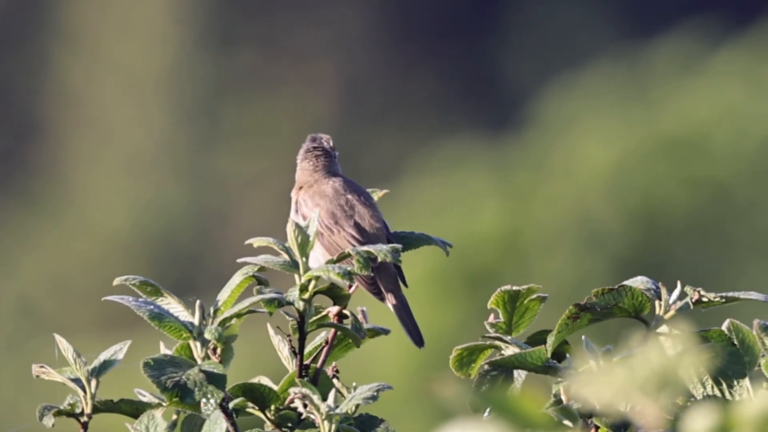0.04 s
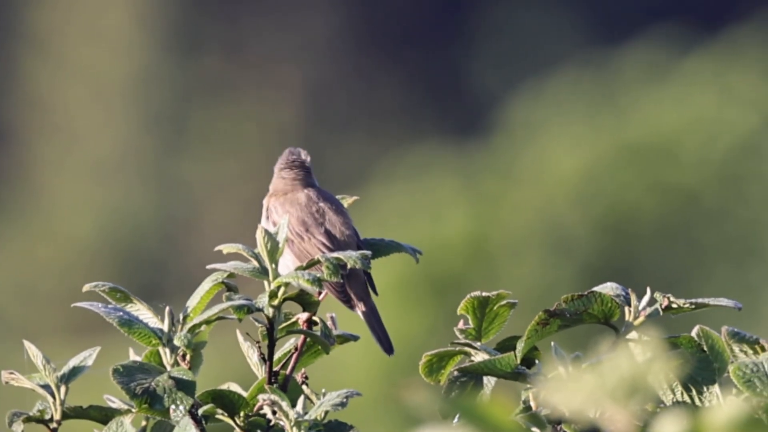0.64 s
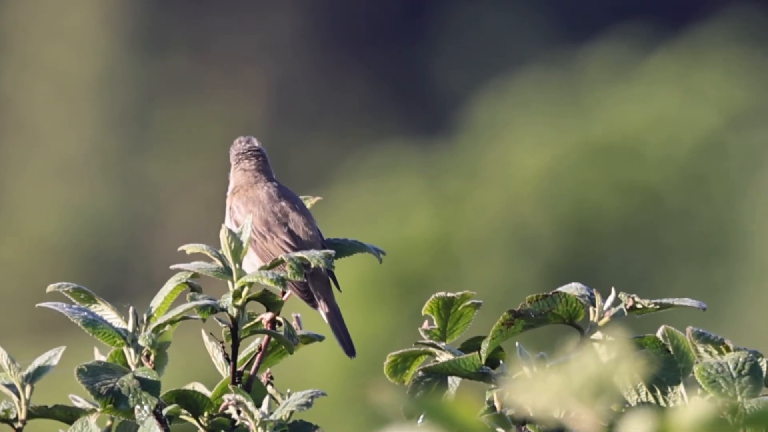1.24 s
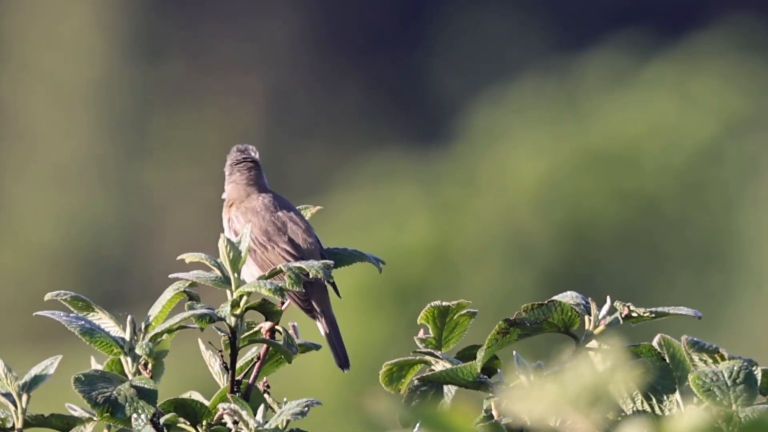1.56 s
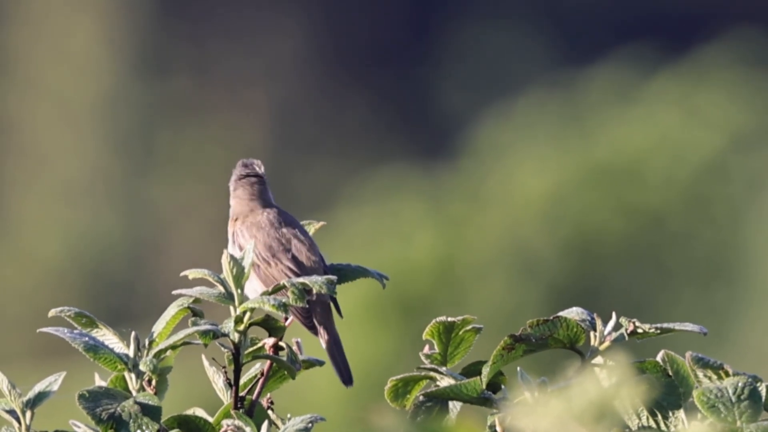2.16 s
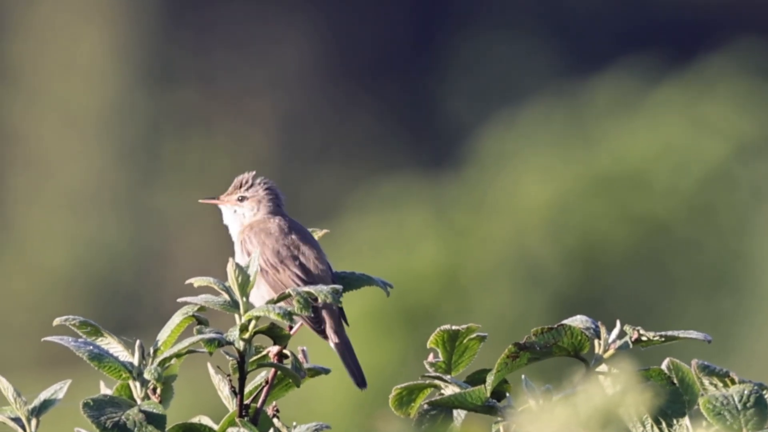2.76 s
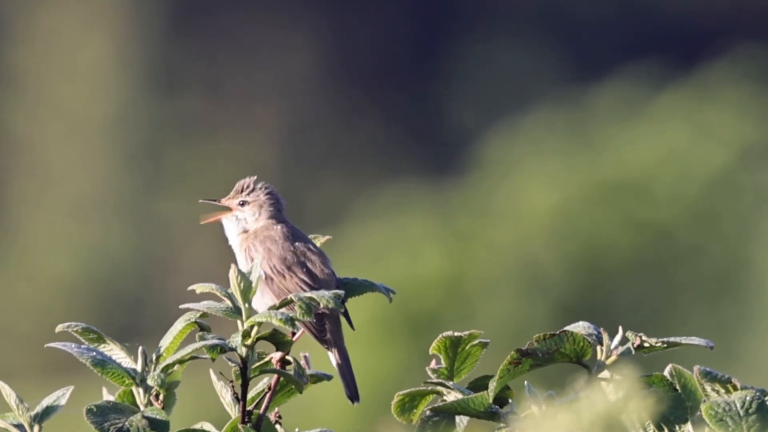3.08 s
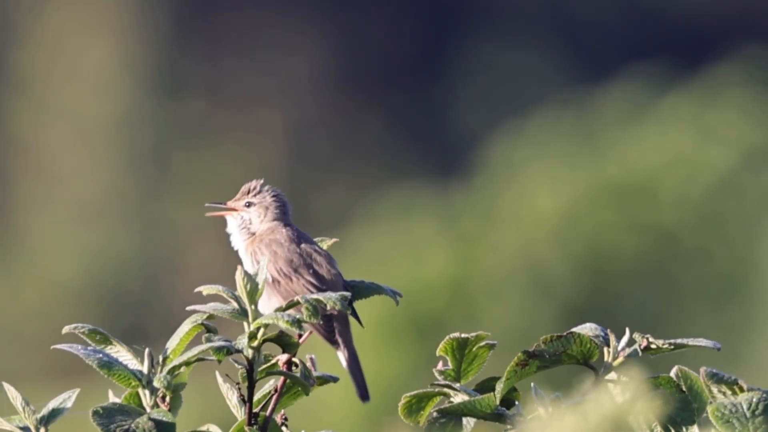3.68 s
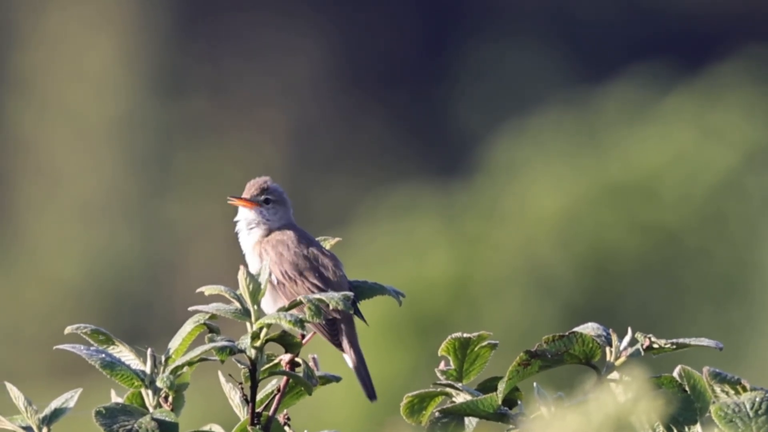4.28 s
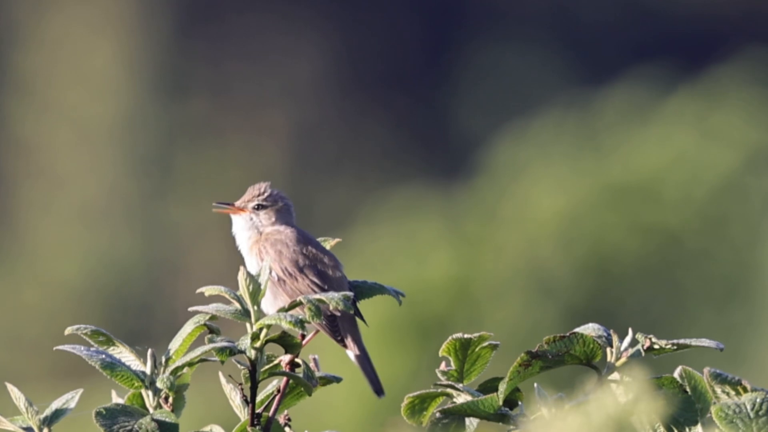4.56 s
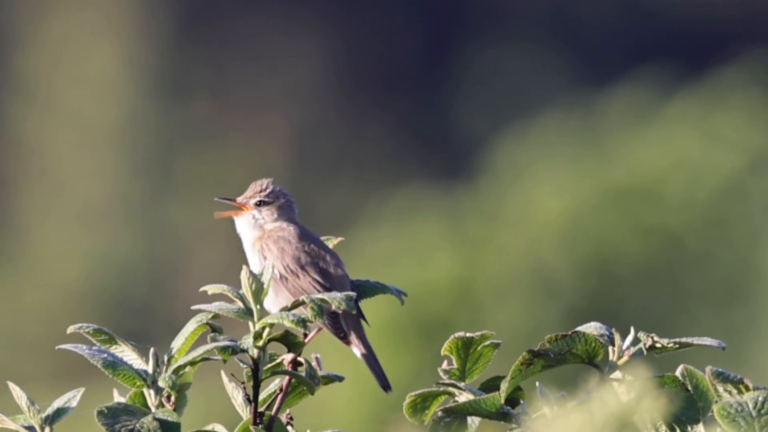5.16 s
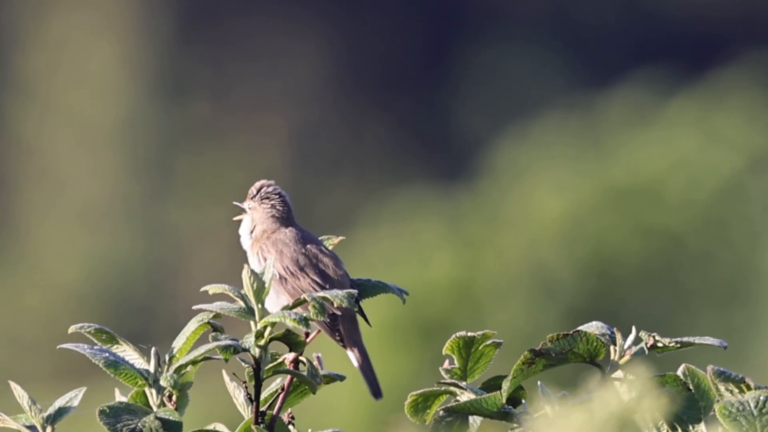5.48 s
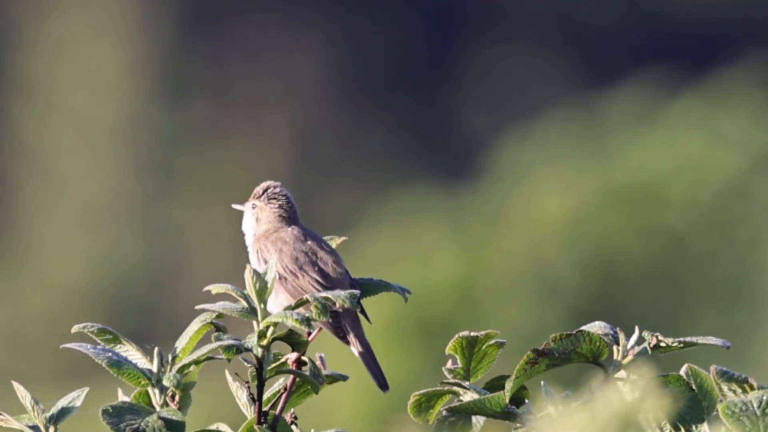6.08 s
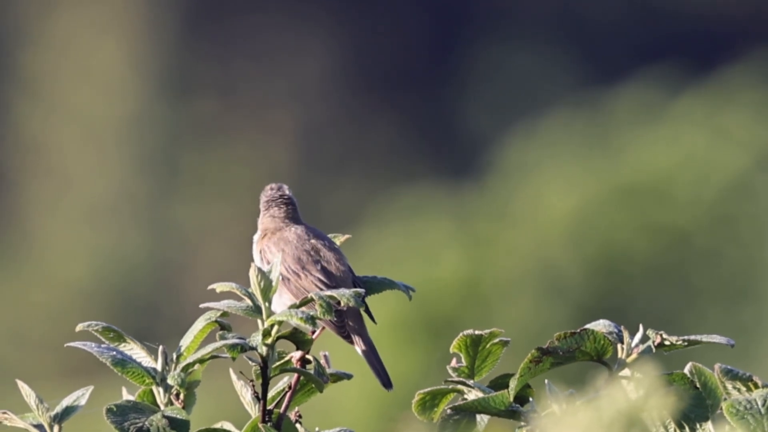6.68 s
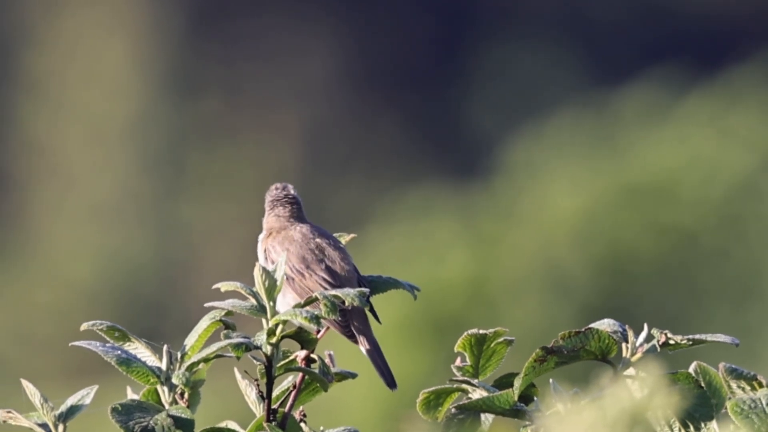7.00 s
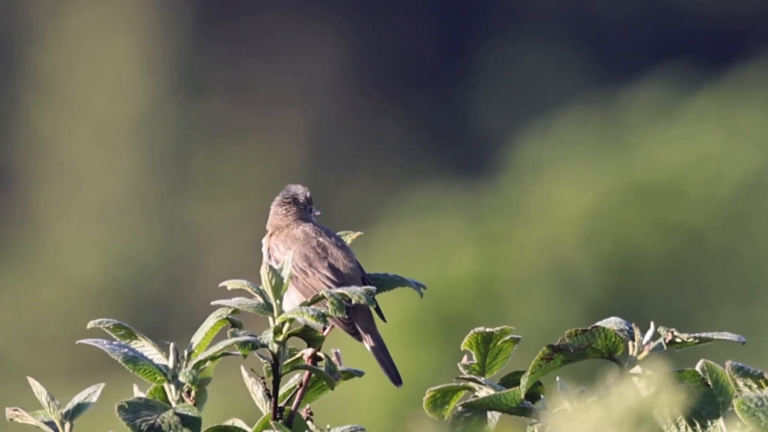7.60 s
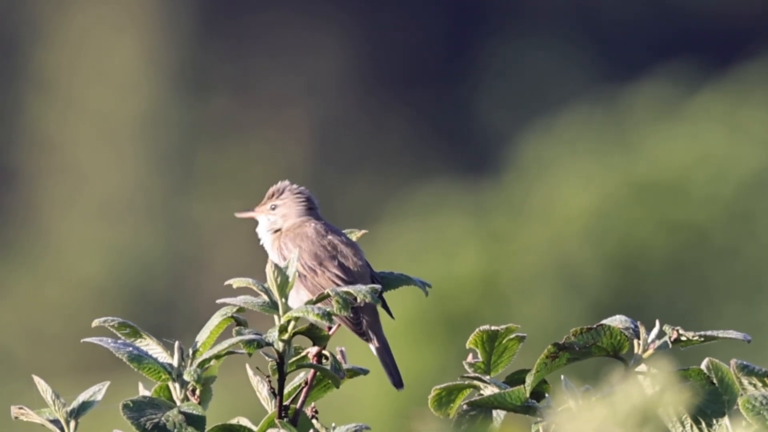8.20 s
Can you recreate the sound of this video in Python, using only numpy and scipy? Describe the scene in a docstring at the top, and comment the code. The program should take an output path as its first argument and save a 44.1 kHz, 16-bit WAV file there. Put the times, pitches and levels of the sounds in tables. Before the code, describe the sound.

A soft, steady wash of distant wind fills open shrubland, and small birds give thin whistles and two-note calls farther off. Leaves rustle faintly around 0.2 to 0.6 seconds. A faint dry tick comes at 0.5 seconds and a sharp one at 0.9, near the microphone. From about 1.3 seconds a warbler sings close by, opening with a soft rasp and four rising whistles. Nasal calls, hoarse rasps and sharp falling chirps follow from 2 to 3.4 seconds, then a fast run of rippling chips until 4.5. Loud squeaks mix with harsh low notes until 5.3, leading into a rapid two-toned trill that ends at 6, with two short notes after it. The foliage adds a light, short echo. From 6.3 seconds to the end, a little after 8, only quieter birds remain, with whistles, short falling notes and purring calls over the hush.

```python
"""Open shrubland. A warbler sings from the top of a bush: rising whistles, rippling chips, rasps, nasal
calls and a two-voiced trill. One side of its syrinx whistles; both sides together squeak and trill.
Other small birds sing farther off, the foliage scatters every note back, and the open air murmurs
underneath. Early on, leaves rustle and two ticks, one faint and one sharp, sound near the microphone."""
import sys
import numpy as np
from scipy import signal
from scipy.fft import rfft, irfft, next_fast_len
from scipy.io import wavfile
from scipy.ndimage import uniform_filter1d

SR = 44100
rng = np.random.default_rng(int(sys.argv[2]) if len(sys.argv) > 2 else 0)


def dump_mix(stems):
    """Bounce the given channels to the path in sys.argv[1] as a 16-bit WAV at rate SR."""
    frames = np.atleast_2d(stems).T  # one column per channel
    limited = np.clip(frames, -1, 1)  # hard clip at full scale
    pcm = np.round(limited * 32767).astype(np.int16)
    wavfile.write(sys.argv[1], SR, pcm)


N = 367794
TIME = np.arange(N) / SR
UPPER_HZ, UPPER_WIDTH_HZ = 12230, 1260  # the windpipe's upper resonance
BAND_LIMIT_HZ = 15720


def warbler():
    """The near bird's whole phrase, from pure whistles to hoarse noise."""
    return gather(slurs() + stutters() + fast_run() + chucks() + squeaks() + trill() + nasals() + rasps())


def slurs():
    """The warbler's fluttering whistles: rising arches, quick flicks and one long swoop."""
    # Note shapes. Each row: share of the note, pitch in Hz, level in dB, ripple depth in Hz.
    arch = [(0, 2940, -14, 197), (.15, 3680, 0.5, 323), (.3, 4190, -2.5, 43), (.63, 4325, -0.5, 3),
            (.84, 4320, -2, 0), (1, 3954, -6.5, 0)]
    flick = [(0, 3110, -10, 400), (.28, 4450, 3, 400), (.53, 5690, -9.5, 350), (.62, 4900, -7.5, 300),
             (.8, 3400, -1.5, 350), (1, 2330, -10, 297)]
    # Each row: start in seconds, length in seconds, level in dB and, for arches, a pitch factor.
    arches = [(1.487, 0.079, -43, 1.005), (1.624, 0.083, -40, 1.012), (1.787, 0.079, -39, 0.9812),
              (1.935, 0.081, -37, 1.01)]
    flicks = [(2.399, .03, -41.5), (3.199, .028, -39.5)]
    # Up and down again. Each row: time in seconds, pitch in Hz, level in dB, ripple depth in Hz.
    swoop = [(3.467, 2050, -51.5, 200), (3.475, 2836, -44, 400), (3.487, 4250, -54.5, 705),
             (3.494, 5470, -54, 500), (3.503, 5750, -41.5, 500), (3.516, 4500, -41.5, 645),
             (3.531, 2960, -36.5, 540), (3.54, 2500, -49, 302)]
    notes = [sing(arch, *row, overtone_db=-38, upper_db=-28) for row in arches]
    notes += [sing(flick, *row, upper_db=-27) for row in flicks]
    return notes + [slur(swoop, upper_db=-9)]


def stutters(plunge_s=.0335, stroke_s=.007, top_hz=5690, step_hz=375, fall_hz=1600):
    """Four short falling strokes, each higher than the last, run into a loud plunge."""
    # Each row: share of the note, pitch in Hz, level in dB, ripple depth in Hz.
    plunge = [(0, 6020, -11, 250), (.16, 5630, -3, 400), (.32, 5680, -5.5, 150), (.58, 4210, .5, 0),
              (.79, 3100, -1.5, 200), (1, 2300, -14, 200)]
    # Each row: start of the plunge in seconds, stroke spacing in seconds, level in dB.
    cues = [(2.54, .013, -36), (3.343, .0113, -34.5)]
    notes = []
    for s, gap_s, db in cues:
        notes.append(sing(plunge, s, plunge_s, db))
        for k in range(4):  # counting back from the plunge
            hz = top_hz - k * step_hz
            notes.append(chip(s - (k + 1) * gap_s, stroke_s, hz + fall_hz / 2, hz, hz - fall_hz / 2, db - 8))
    return notes


def fast_run(landing_hz=2750):
    """Rippling chips all fall to one pitch; higher ones start farther up and ripple more slowly."""
    # Each row: start in seconds, length in seconds, middle pitch in Hz, level in dB.
    cues = [(3.437, 0.015, 3280, -43.5), (3.581, 0.021, 3480, -43.5), (3.632, .022, 3460, -44.5),
            (3.684, 0.022, 3650, -43.5), (3.744, 0.02, 3526, -42.5), (3.804, .02, 3540, -41.5),
            (3.86, 0.02, 3420, -42.5), (3.92, 0.019, 3540, -44), (3.974, 0.023, 3730, -44),
            (4.029, .026, 3690, -42), (4.091, .023, 3800, -41), (4.153, .02, 3535, -42),
            (4.21, .024, 3530, -41.5), (4.264, 0.022, 3320, -41.5), (4.321, 0.024, 3264, -41.5),
            (4.382, 0.02, 3120, -42.5), (4.451, 0.036, 3880, -43)]
    notes = []
    for s, length, hz, db in cues:
        height = hz / landing_hz
        arc = hz * height ** .62, hz, landing_hz
        notes.append(chip(s, length, *arc, db, depth_hz=644, rate_hz=397 / height ** 3.1))
    return notes


def chucks(arc_hz=(3300, 2600, 2350), jitter=.105):
    """Low falling notes, shaken so fast that they turn harsh, dying away in the throat."""
    # Each row: start in seconds, length in seconds, level in dB.
    cues = [(4.975, 0.047, -40.5), (5.096, 0.052, -41), (6.254, 0.0385, -43)]
    notes = []
    for s, length, db in cues:
        u, hz = glide(length, *arc_hz)
        harsh = whistle(hz * (1 + jitter * wander(len(u), 1533)), depth_hz=750, rate_hz=430)
        voice = resonate(harsh, hz=2650, width_hz=1900)
        notes.append((s, amp(db) * unit(voice) * swell(u, .32) ** 2))
    return notes


def squeaks(attack_s=.0068, release_s=.008):
    """Two voices leap up together and spread apart, with clear overtones."""
    # Each row: share of the note, low voice in Hz, high voice in Hz, level in dB.
    shape = [(0, 1833, 2487, 0.5), (.2, 3150, 3680, -4), (0.361, 4273, 5680, -2), (.59, 4240, 6760, -10),
             (.8, 4050, 6160, -7), (1, 3680, 4700, -18)]
    # Each row: start and full length in seconds, level in dB, high-voice factor, cut-off in seconds.
    cues = [(4.615, 0.07, -34.5, 1.07, .049), (4.851, 0.045, -33, 1.0, .05), (5.2, .047, -31.5, .99, .05),
            (5.298, 0.046, -33, 1.0, .05)]
    notes = []
    for s, length, db, factor, stop_s in cues:
        rows = [(u * length, low, high, db + lift_db) for u, low, high, lift_db in shape]
        voice = two_voices(rows, factor, high_db=-1.5, coupling=.7, jitter=.011, octave_db=0, hiss_db=-4)
        voice = voice[:int(stop_s * SR)]
        t = np.arange(len(voice)) / SR
        notes.append((s, voice * np.minimum(t / attack_s, 1) * np.minimum(t[::-1] / release_s, 1)))
    return notes


def trill(length_spread=.0314, level_spread_db=1):
    """A two-voiced syllable, repeated with small slips of timing and breath pressure."""
    # Each row: seconds into the syllable, low voice in Hz, high voice in Hz, level in dB.
    syllable = [(0, 3410, 3930, -5), (.005, 4328, 5280, -2.5), (.015, 4474, 6150, -6.5),
                (.021, 4200, 5870, -1.5), (.026, 3897, 5040, 1.5), (.031, 2700, 3500, -1),
                (.037, 2077, 2710, 3.5), (.045, 1720, 2140, 4.5)]
    # Each row: start in seconds, level in dB, pitch factor on the high voice.
    cues = [(5.396, -40, 1.13), (5.483, -38, 1.02), (5.564, -37, 1.04), (5.64, -37, 1), (5.719, -38, 1.08),
            (5.8, -37.5, 1.05), (5.885, -37, 1.02), (5.973, -37, 1)]
    notes = []
    for s, db, factor in cues:
        stretch, *slips = rng.standard_normal(len(syllable) + 1)
        rows = [(t * (1 + length_spread * stretch), low, high, lift_db + level_spread_db * slip)
                for (t, low, high, lift_db), slip in zip(syllable, slips)]
        voice = two_voices(rows, factor, high_db=.5, coupling=.36, jitter=.0323, octave_db=-6, hiss_db=-14)
        notes.append((s, amp(db) * voice))
    return notes


def nasals(upper_db=-31):
    """A pulsing membrane, rich in harmonics, sounds through the throat and its upper resonance."""
    # Each row: start and length in seconds; start, middle and end pitch in Hz; resonance and
    # its width in Hz; level in dB; loudest point and roughness, both from 0 to 1.
    cues = [ (2.24, 0.056, 1288, 1626, 1150, 3540, 1300, -43, 0.65, 0.13),
            (2.304, 0.056, 1257, 1667, 2130, 4664, 1430, -44, 0.85, .18),
            (2.626, 0.04, 800, 821.2, 810, 2800, 850, -48, 0.5, 0.2),
            (2.655, 0.039, 758, 966, 1099, 2700, 990, -45, 0, 0.5),
            (2.698, 0.058, 828, 792, 867, 2740, 850, -47, 0.73, 0.44),
            (2.788, 0.021, 912, 936, 870, 5700, 1440, -39.5, 0.23, 0.32),
            (4.477, .071, 2996, 1793, 1015, 4230, 1630, -39.5, 0.11, 0.14),
            (6.081, 0.032, 970, 1127, 980, 4800, 1880, -46.5, 0.8, 0.21)]
    notes = []
    for s, length, start, middle, end, hz, width, db, peak, rough in cues:
        u, pitch = glide(length, start, middle, end)
        turn = phase(pitch, jitter=.1 * rough)
        pulses = sum(np.cos(k * turn) * (k * pitch < BAND_LIMIT_HZ) for k in range(1, 10))
        drive = (1 - rough) * unit(pulses) + rough * rng.standard_normal(len(u))
        voice = resonate(drive, hz, width) + amp(upper_db) * resonate(drive, UPPER_HZ, UPPER_WIDTH_HZ)
        notes.append((s, amp(db) * unit(voice) * swell(u, peak)))
    return notes


def rasps(rattle=.12, rattle_hz=260):
    """Chaotic vibration: hoarse, rattling noise in the throat resonance."""
    # Each row: start and length in seconds, resonance and width in Hz, level in dB, loudest point 0-1.
    cues = [(1.31, 0.028, 3600, 1363, -52.5, 0.5), (2.093, 0.053, 3980, 1470, -48, 0.62),
            (2.932, 0.079, 3240, 1110, -44, 0.3), (2.975, 0.19, 3440, 940, -48, 0.18),
            (4.712, 0.054, 3650, 1610, -47, 0.48), (5.131, 0.052, 2840, 1090, -52.5, 0.9)]
    notes = []
    for s, length, hz, width, db, peak in cues:
        u = np.linspace(0, 1, int(length * SR))
        drive = rng.standard_normal(len(u))
        drive *= 1 + rattle * np.sin(phase(np.full(len(u), rattle_hz), jitter=.32))
        notes.append((s, amp(db) * unit(resonate(drive, hz, width)) * swell(u, peak)))
    return notes


def whistle(hz, depth_hz, rate_hz, throb=.49, overtone_db=-44, upper_db=-32):
    """One side of the syrinx: a near sine whose pitch ripples unevenly, loudest on each downstroke."""
    ripple = phase(np.full(len(hz), rate_hz), jitter=.22)
    reach = np.clip(.75 + .25 * wander(len(hz), 300), 0, 1)
    turn = phase(hz + depth_hz * reach * np.cos(ripple), jitter=.0076)
    pulse = 1 + throb * np.minimum(depth_hz / 500, 1) * np.sin(ripple)
    tone = np.sin(turn)
    for k in (2, 3):  # overtones light up as they cross the upper resonance
        lift = np.exp(-(2 * (k * hz - UPPER_HZ) / UPPER_WIDTH_HZ) ** 2)
        gain = (amp(overtone_db) + amp(upper_db) * lift) / (k - 1) ** 2
        tone += gain * np.sin(k * turn) * (k * hz < BAND_LIMIT_HZ)
    return np.sqrt(2) * pulse * tone


def two_voices(rows, high_factor, high_db, coupling, jitter, octave_db, hiss_db):
    """Both sides of the syrinx sound at once; the shared airflow adds overtones and sum tones."""
    # Windpipe and beak. Each row: frequency in Hz, gain in dB.
    throat = [(1000, -29), (2200, -25.5), (3200, -12), (4200, -2.5), (6400, -2), (7300, -10.5), (8500, -22),
              (10500, -27.5), (12700, -18), (15000, -29)]
    low_hz, high_hz, db = contour(rows)
    slack = np.clip(2 * (1 - low_hz / low_hz.max()), 0, 1)  # slack membranes run rough and leak hiss
    tremble = jitter + .049 * slack
    low = np.sin(phase(low_hz, tremble))
    high = amp(high_db) * np.sin(phase(high_hz * high_factor, tremble))
    products = low ** 2 + 2 * low * high + amp(octave_db) * high ** 2
    hiss = amp(hiss_db) * slack * rng.standard_normal(len(low))
    flow = low + high + coupling * (products - products.mean()) + hiss
    return colour(flow, throat) * amp(db) * signal.windows.tukey(len(db), .08)


def slur(rows, overtone_db=-44, upper_db=-21.5):
    """A whistle that flutters as it climbs or falls along a contour."""
    hz, db, depth_hz = contour(rows)
    tone = whistle(hz, depth_hz, rate_hz=202.7, overtone_db=overtone_db, upper_db=upper_db)
    return rows[0][0], amp(db) * tone * signal.windows.tukey(len(hz), .06)


def sing(shape, s, length, db, factor=1, **tone):
    """One rendition of a learned note, stretched to its length and moved in pitch and level."""
    rows = [(s + u * length, hz * factor, db + lift_db, depth) for u, hz, lift_db, depth in shape]
    return slur(rows, **tone)


def chip(s, length, start, middle, end, db, depth_hz=0, rate_hz=0):
    """A short whistled arc through three pitches."""
    u, hz = glide(length, start, middle, end)
    return s, amp(db) * whistle(hz, depth_hz, rate_hz, throb=.41) * signal.windows.tukey(len(u), .3)


def ticks(attack_s=.00048):
    """Small dry knocks that die within milliseconds."""
    # Each row: start in seconds, peak level in dB.
    cues = [(.519, -39), (.9387, -26)]
    # The ring. Each row: frequency in Hz, level in dB, seconds to fade by 60 dB.
    modes = [(957, -10.5, 0.0096), (2200, 4.5, 0.003), (2510, -12, 0.0071), (4240, -1.5, 0.0026),
             (6500, 2, 0.00143), (9500, -8, .002)]
    t = np.arange(SR // 40) / SR
    ring = sum(amp(db - 60 * t / t60) * np.sin(2 * np.pi * hz * t) for hz, db, t60 in modes)
    ring *= 1 - np.exp(-t / attack_s)
    return gather([(s, amp(db) * ring / abs(ring).max()) for s, db in cues])


def neighbours(drop_s=.025, drop_hz=(2980, 2534, 2080)):
    """Clear whistled notes from birds in the next bushes."""
    # Plain whistles. Each row: start and length in seconds, pitch in Hz, share it droops, level in dB.
    whistles = [(0, 0.024, 2070, 0.051, -51), (.808, 0.0743, 5640, 0.15, -55),
                (.809, 0.11, 2117, 0.035, -58), (1.028, .063, 6180, 0.095, -55.5),
                (1.077, .024, 1830, 0.054, -52.5), (1.038, .022, 4700, .11, -64),
                (1.098, 0.018, 3450, 0.46, -57.5), (1.132, 0.024, 4550, .11, -61),
                (1.634, .13, 2347, 0.074, -58), (1.864, 0.25, 6790, 0.076, -67),
                (2.656, 0.045, 4485, .04, -48.5), (2.737, 0.033, 4230, .1, -54),
                (2.847, 0.066, 5980, 0.061, -55.5), (3.29, 0.064, 3930, 0.041, -57),
                (3.654, 0.029, 4667, .12, -55.5), (4.245, 0.0207, 4140, 0.16, -57),
                (4.316, 0.014, 4560, .05, -57), (6.655, 0.091, 4188, 0.043, -62),
                (7.18, .04, 5370, .01, -68), (7.41, 0.053, 4180, 0.095, -64),
                (7.6, 0.066, 4260, .14, -67.5)]
    # The purring bird's low falling notes. Each row: start in seconds, level in dB, pitch factor.
    drops = [(7.232, -53, 1.05), (7.335, -56, 0.96), (7.742, -51, 1.0), (7.841, -51.5, 0.95),
             (8.281, -54, .88), (8.308, -52.5, 1.0)]
    # A low, wavering whistle. Each row: time in seconds, pitch in Hz, level in dB, ripple depth in Hz.
    waver = [(6.98, 2330, -67, 20), (7.035, 2240, -62, 20), (7.055, 1950, -59, 20), (7.085, 2005, -61, 20),
             (7.105, 1810, -61, 20), (7.17, 2007, -60, 20)]
    notes = hooks() + sweeps() + [droop(*row) for row in whistles] + couplets()
    notes += [chip(s, drop_s, *np.multiply(drop_hz, factor), db) for s, db, factor in drops]
    return gather(notes + reel() + [slur(waver)])


def hooks():
    """A thin note, repeated: it climbs, fades at the top and slides down."""
    # Each row: seconds into the note, pitch in Hz, level in dB.
    shape = [(0, 5000, -5.5), (.01, 6380, -3), (.024, 6870, -27), (.043, 6540, -1.5), (.063, 5040, -1),
             (.085, 3800, -7)]
    # Each row: start in seconds, level in dB.
    cues = [(.044, -53), (0.167, -52.5), (0.291, -53), (.419, -54)]
    hz, shape_db = contour(shape)
    fade = signal.windows.tukey(len(hz), .1)
    return [(s, amp(db + shape_db) * whistle(hz, 0, 0) * fade) for s, db in cues]


def sweeps(top_hz=6900, goal_hz=3040, fall_s=.028):
    """Steep falls that slow as the pitch relaxes; longer ones reach lower."""
    # Each row: start in seconds, length in seconds, level in dB.
    cues = [(0.718, 0.066, -63.5), (1.353, 0.056, -55.5), (1.672, 0.0246, -59), (1.991, 0.062, -52.5),
            (2.306, 0.02, -59.5), (2.628, 0.034, -55.5), (2.959, .037, -52), (3.276, 0.022, -59),
            (3.074, .016, -61), (3.555, 0.028, -55), (3.877, 0.049, -50.5), (4.204, 0.0255, -56),
            (7.335, .018, -71), (7.66, .02, -72), (7.983, .02, -69)]
    notes = []
    for s, length, db in cues:
        arc = goal_hz + (top_hz - goal_hz) * np.exp(-np.array([0, .5, 1]) * length / fall_s)
        notes.append(chip(s, length, *arc, db))
    return notes


def droop(s, length, hz, fall, db, depth_hz=0, rate_hz=0):
    """A held note that sags ever faster towards its end."""
    return chip(s, length, hz, hz * (1 - fall / 4), hz * (1 - fall), db, depth_hz, rate_hz)


def couplets(point_s=.035, hump_after_s=.081, hump_s=.084):
    """Two-note calls: a pointed whistle, then a rounded one."""
    # Note shapes. Each row: share of the note, pitch in Hz, level in dB, ripple depth in Hz.
    point = [(0, 2200, -1.5, 0), (.3, 2790, 2, 0), (.47, 3580, -2, 0), (.72, 2725, 1.5, 0),
             (1, 2230, 1, 0.004)]
    hump = [(0, 2230, 0.5, 30), (.22, 2750, 1.5, 79), (.48, 3690, -3.5, 50), (.62, 3830, -10, 0),
            (.82, 3365, 4.5, 0), (1, 3110, 0, 0)]
    # Each row: start in seconds, level in dB.
    cues = [(.511, -52), (.876, -52.5), (1.386, -53.5), (1.857, -53.5)]
    notes = []
    for s, db in cues:
        notes += [sing(point, s, point_s, db), sing(hump, s + hump_after_s, hump_s, db)]
    return notes


def reel(start_s=.99, gap_s=.0247, stroke_s=.00746, arc_hz=(6450, 5370, 4300)):
    """A distant bird's dry, even reel of tiny downstrokes."""
    return [chip(start_s + k * gap_s, stroke_s, *arc_hz, db=-68) for k in range(14)]


def buzzers():
    """Buzzing, purring and thin high notes from deeper in the shrubs."""
    # Each row: start and length in seconds, middle pitch in Hz, level in dB.
    thin_arcs = [(0.56, 0.25, 7650, -77.5), (2.473, .07, 7030, -67), (2.997, .065, 7330, -68),
                 (3.162, 0.11, 7250, -66), (3.338, 0.111, 7340, -66.5), (3.52, .11, 7270, -69),
                 (3.694, 0.13, 7480, -67.5), (5.099, 0.088, 7480, -61.5)]
    # Each row: start and length in seconds, level in dB.
    purrs = [(7.135, 0.13, -59.5), (7.426, .1, -65.5), (7.639, 0.12, -56.5), (8.197, 0.13, -56)]
    # Each row: start and length in seconds, pitch in Hz, share it falls, level in dB,
    # ripple depth in Hz, ripples a second.
    buzzes = [(0.026, .064, 4140, 0.048, -54.5, 200, 99), (0.146, .085, 2465, 0.25, -52, 180, 147),
              (6.83, 0.072, 3950, 0.0068, -65.5, 150, 60), (7.03, .11, 4640, .16, -67, 200, 70),
              (7.869, .26, 1644, .17, -66, 201, 70), (7.918, .17, 2420, 0.099, -64, 280, 70),
              (8.081, .14, 4390, 0.096, -67, 150, 60)]
    thin = [chip(s, length, hz * .96, hz, hz * .935, db, depth_hz=70, rate_hz=110)
            for s, length, hz, db in thin_arcs]
    return gather(thin + [purr(*row) for row in purrs] + [droop(*row) for row in buzzes])


def purr(s, length, db, pitch_hz=3043, depth_hz=310, rate_hz=88, rise_db=6, throb=.61, sag=.05):
    """A rippling note, loudest on each downstroke, that grows louder and sags as it goes."""
    u = np.linspace(-.5, .5, int(length * SR))
    ripple = phase(np.full(len(u), rate_hz), jitter=.053)
    hz = pitch_hz * (1 - sag * u) + depth_hz * np.cos(ripple)
    tone = np.sin(phase(hz, jitter=.023)) * (1 + throb * np.sin(ripple))
    return s, np.sqrt(2) * amp(db + rise_db * u) * tone * signal.windows.tukey(len(u), .4)


def far_chorus(count=300, high_hz=4050, low_hz=2200, spread=.25):
    """Distant birds in two registers: arcs of random pitch and length, heard only through the leaves."""
    notes = []
    for when, length, register, pitch, bend, slope in rng.random((count, 6)):
        hz = (high_hz if register < .7 else low_hz) * np.exp(spread * (pitch - .5))
        arc = hz, hz * (.81 + .2 * bend), hz * (.7 + .303 * slope)
        notes.append(chip(when * N / SR, .033 + .07 * length, *arc, db=0, depth_hz=110, rate_hz=45.21))
    chorus = gather(notes)
    return unit(foliage(chorus) + twigs(chorus))


def distant_warble(pitch_hz=4155, span=.065, swing_db=5.5, direct_db=-6):
    """An unbroken song that meanders in pitch and comes and goes, heard mostly through the leaves."""
    hz = pitch_hz * np.exp(span * wander(N, 26))
    song = whistle(hz, depth_hz=121, rate_hz=60) * amp(swing_db * np.tanh(2 * wander(N, 17)))
    return unit(amp(direct_db) * song + twigs(song) + foliage(song))


def leaf_bounce(x, db=-12, delay_s=.00363):
    """One strong reflection from the top of the shrub follows the direct sound closely."""
    return x + amp(db) * gather([(delay_s, x)])


def twigs(x, decay_s=.0077):
    """The leaves right around the perch smear each note by a few milliseconds."""
    t = np.arange(SR // 25) / SR
    taps = rng.standard_normal(len(t)) * np.exp(-t / decay_s) * (t > .001)
    return signal.fftconvolve(x, taps / np.linalg.norm(taps))[:N]


def foliage(x, build_s=.0081, echoes_per_s=2000):
    """Leaves and bushes scatter sound back: sparse echoes that build up, then die band by band."""
    # Each row: frequency in Hz, seconds to fade by 60 dB.
    decay_times = [(1500, 0.75), (4000, 0.29), (6500, 0.61), (9000, 0.25), (15000, 0.063)]
    t = np.arange(SR * 3 // 4) / SR
    taps = rng.standard_normal(len(t)) * (rng.random(len(t)) < echoes_per_s / SR)
    taps *= 1 - np.exp(-t / build_s)
    hz, s, bands = signal.stft(taps, SR, nperseg=256)
    decay = amp(-60 * s / read(decay_times, hz)[:, None])
    tail = signal.istft(bands * decay, SR, nperseg=256)[1]
    return signal.fftconvolve(x, tail / np.linalg.norm(tail) * np.sqrt(.5))[:N]


def rustle(start_s=.22, length_s=.36, db=-59, grain_db=5.5):
    """Leaves brush together: grainy noise that swells and stops."""
    # Each row: frequency in Hz, relative level in dB.
    spectrum = [(300, -12), (1200, 5), (4000, 4), (8000, -13), (15000, -26)]
    u = np.linspace(0, 1, int(length_s * SR))
    grains = rng.standard_normal(len(u)) * amp(grain_db * wander(len(u), 252))
    return gather([(start_s, amp(db) * unit(colour(grains, spectrum)) * swell(u, .58))])


def air(db=-58.5, low_hz=2200, drift_db=.22):
    """Distant wind and leaves: a steady wash whose low part swells slowly."""
    # Each row: frequency in Hz, relative level in dB.
    spectrum = [(25, -35), (50, -18), (90, -7), (130, -6), (200, -8), (280, -2.5), (380, -5), (550, -3.5),
                (900, -1.5), (1400, -4), (2500, -7), (5000, -15.5), (8000, -23), (15500, -35)]
    # The outline that the swell partly follows. Each row: time in seconds, level in dB.
    outline = [(0, -60.5), (.5, -57.5), (.8, -59), (1.4, -60.5), (2.6, -60), (3.6, -61.5), (5, -61),
               (6.6, -61), (8.3, -60.5)]
    wash = amp(db) * unit(colour(rng.standard_normal(N), spectrum))
    low = signal.sosfiltfilt(signal.butter(2, low_hz, fs=SR, output="sos"), wash)
    s, outline_db = np.transpose(outline)
    swell_db = .7 * np.interp(TIME, s, outline_db - np.percentile(outline_db, 25))
    swell_db += drift_db * wander(N, 5.1)
    return wash + low * (amp(swell_db) - 1)


def amp(db):
    """Turns decibels into a gain."""
    return 10 ** (np.asarray(db) / 20)


def unit(x):
    """Scales to an rms of one."""
    return x / np.sqrt(np.mean(x ** 2) + 1e-20)


def read(points, hz):
    """Reads a curve on a log-frequency axis."""
    f, value = np.transpose(points)
    return np.interp(np.log(hz + 1), np.log(f + 1), value)


def colour(x, points):
    """Filters by a spectrum in dB."""
    size = next_fast_len(len(x) + 256)
    gain = amp(read(points, np.fft.rfftfreq(size, 1 / SR)))
    return irfft(rfft(x, size) * gain, size)[:len(x)]


def resonate(x, hz, width_hz):
    """A steep-sided resonance."""
    off = (np.fft.rfftfreq(2 * len(x), 1 / SR) - hz) / width_hz
    return irfft(rfft(x, 2 * len(x)) / (1 + 2 * off ** 2 + .5 * off ** 4))[:len(x)]


def wander(size, hz):
    """A random drift of about unit size that turns hz times a second."""
    knots = np.arange(size) * hz / SR
    return np.interp(knots, np.arange(4096), rng.standard_normal(4096))


def phase(hz, jitter):
    """Running phase of a membrane whose pitch trembles a little."""
    return 2 * np.pi * np.cumsum(hz * (1 + jitter * wander(len(hz), 906))) / SR


def contour(rows):
    """Joins the timed points of a note into smooth curves, one for each column after the time."""
    s, *columns = np.transpose(rows)
    s = np.sort(s)
    t = np.arange(s[0], s[-1], 1 / SR)
    return [uniform_filter1d(np.interp(t, s, c), size=130, mode="nearest") for c in columns]


def glide(length, start, middle, end):
    """Progress 0-1 through a note, and a pitch arc through three points."""
    u = np.linspace(0, 1, max(int(length * SR), 64))
    parabola = np.polyfit([0, .5, 1], np.log([start, middle, end]), 2)
    return u, np.exp(np.polyval(parabola, u))


def swell(u, peak):
    """Air pressure rises to its loudest point and falls away."""
    return np.sin(np.pi / 2 * np.interp(u, [0, np.clip(peak, .05, .95), 1], [0, 1, 0]))


def gather(notes):
    """Lays (start in seconds, sound) pairs on one track."""
    track = np.zeros(N)
    for s, sound in notes:
        part = track[max(round(s * SR), 0):][:len(sound)]
        part += sound[:len(part)]
    return track


def scene():
    """Birds and ticks reach a single microphone directly and by way of the leaves."""
    # The far birds' fader. Each row: time in seconds, gain in dB.
    far_fader = [(0, -69), (2.2, -59.5), (4.5, -64.5), (6.2, -62.5), (6.7, -70.5), (7.4, -70.5),
                 (8.3, -67.5)]
    # How well leaves reflect. Each row: frequency in Hz, gain in dB.
    leaf_tone = [(1500, 9), (3000, 1), (4500, 6), (6200, 2.5), (7500, -0.5), (10000, -5)]
    near = leaf_bounce(warbler()) + ticks()
    others, buzzes = neighbours(), buzzers()
    far = amp(-3) * far_chorus() + amp(-5) * distant_warble()
    far *= amp(np.interp(TIME, *np.transpose(far_fader)))
    smear = twigs(amp(-17) * near + amp(-10) * (others + buzzes))  # neighbours sing through more leaves
    echo_send = amp(-16) * near + amp(-12) * others + amp(-8) * buzzes
    echoes = foliage(colour(echo_send, leaf_tone))
    mono = near + others + buzzes + smear + echoes + far + rustle() + air()
    return np.array([mono, mono])


def record(dry):
    """A steep low-pass takes off the highest treble."""
    lowpass = signal.firwin(511, BAND_LIMIT_HZ, window=("kaiser", 9), fs=SR)
    return signal.oaconvolve(dry, lowpass[None], "same", axes=1)


dry = scene()
out = record(dry)
dump_mix(out)
```